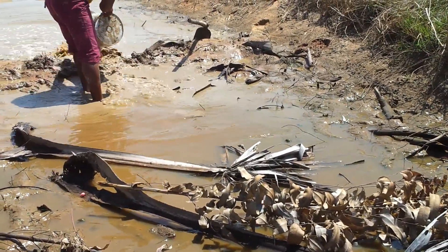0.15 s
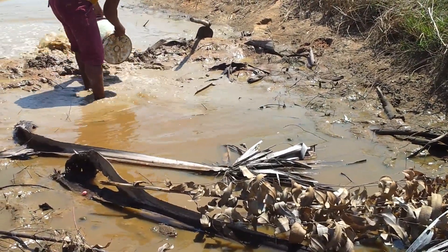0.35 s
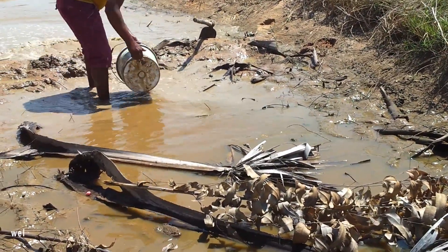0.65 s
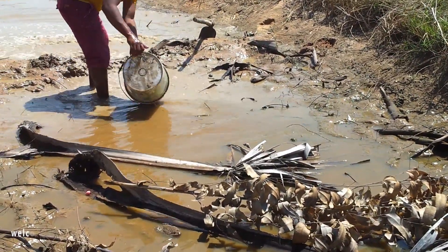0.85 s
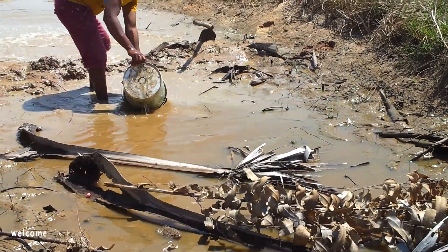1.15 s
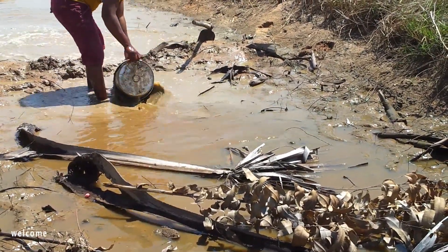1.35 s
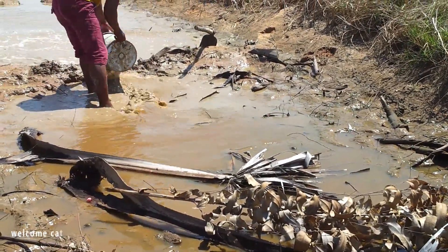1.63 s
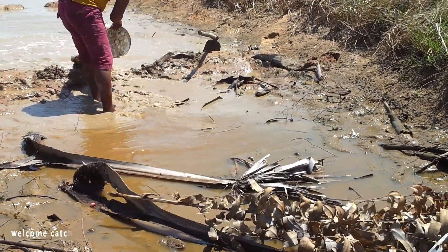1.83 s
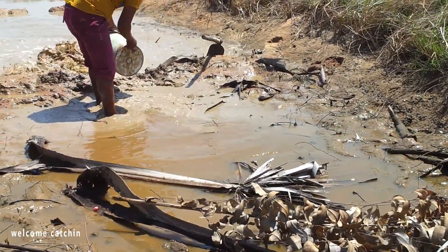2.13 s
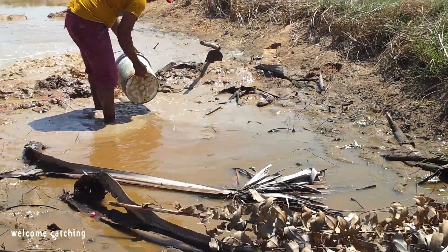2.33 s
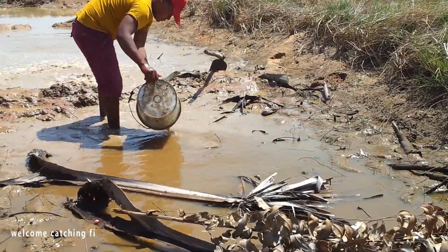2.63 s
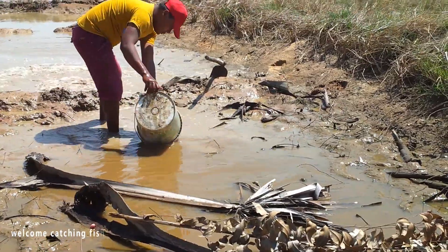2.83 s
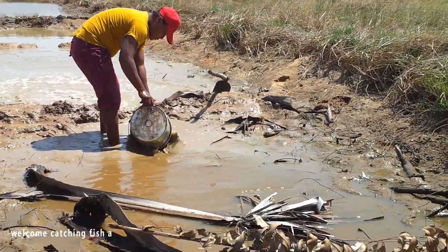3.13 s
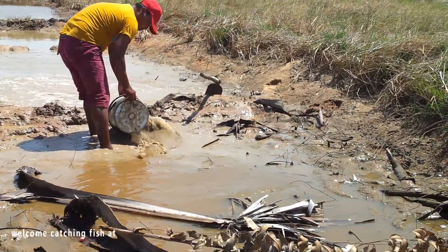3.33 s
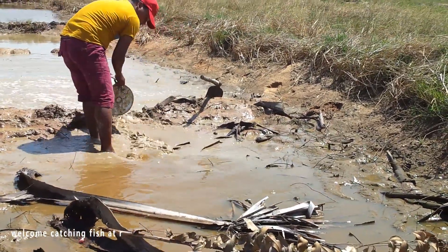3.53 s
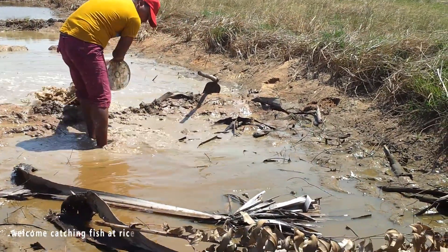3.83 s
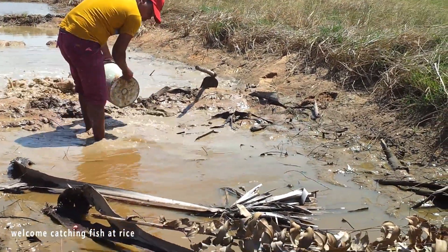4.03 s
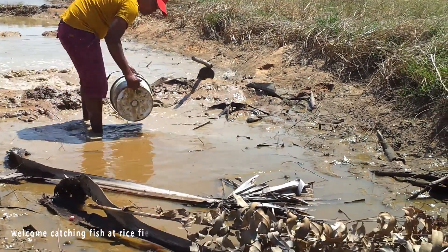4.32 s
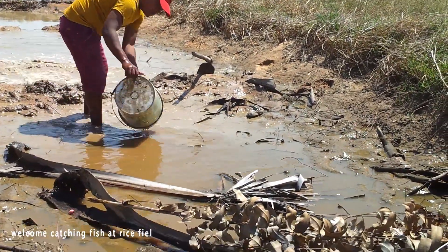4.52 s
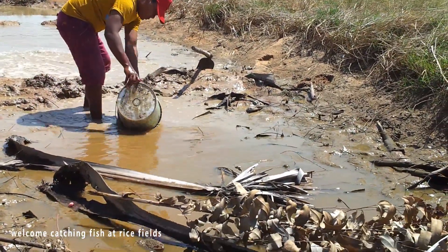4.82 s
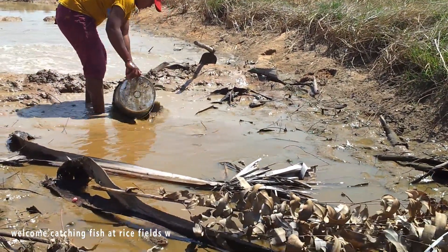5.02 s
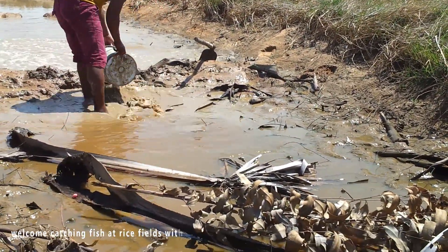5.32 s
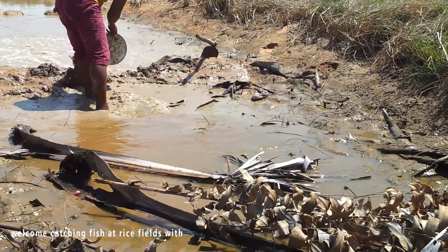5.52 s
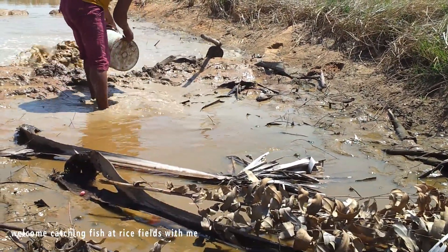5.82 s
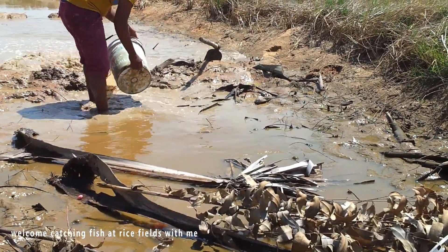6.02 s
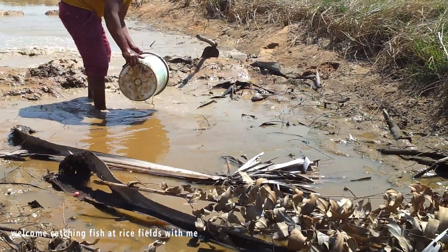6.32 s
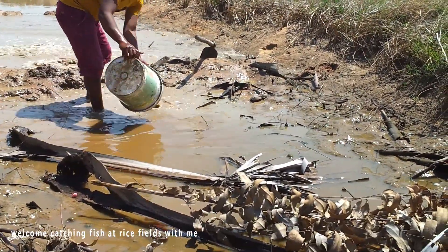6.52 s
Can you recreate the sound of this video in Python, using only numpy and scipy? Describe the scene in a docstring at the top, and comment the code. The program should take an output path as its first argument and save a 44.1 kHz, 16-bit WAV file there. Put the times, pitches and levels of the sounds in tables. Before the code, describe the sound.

A bucket bails a muddy pool outdoors: handle clatter, gurgling scoop, then a heavy splashing throw, repeated, with wind thumping the microphone.

```python
"""A bucket bails a muddy field pool: water is scooped, flung, slaps down and rains out.
Clouds of rising damped sines over coloured noise make the wash; single pockets, drops and noise bursts stand out.
Before each scoop the handle clatters on the empty bucket: filtered noise, wall notes, rim ring and a crack.
The mud banks add a short noise tail to water and bucket.
Wind buffets and thumps the microphone as low-passed turbulence, over a faint noise hiss of dry grass."""
import sys
import numpy as np
from scipy import signal
from scipy.fft import rfft, irfft, next_fast_len
from scipy.io import wavfile
from scipy.ndimage import uniform_filter1d, map_coordinates

SR = 44100
rng = np.random.default_rng(int(sys.argv[2]) if len(sys.argv) > 2 else 0)


def dump_mix(stems):
    """Bounce the given channels to the path in sys.argv[1] as a 16-bit WAV at rate SR."""
    frames = np.atleast_2d(stems).T  # one column per channel
    limited = np.clip(frames, -1, 1)  # hard clip at full scale
    pcm = np.round(limited * 32767).astype(np.int16)
    wavfile.write(sys.argv[1], SR, pcm)


N = 293706

# The rim drags through the pool and the bucket fills. Levels precede the water mix. Each row: start in seconds,
# length in seconds, crest as share of length before its timing factor, gulp in dB, splash in dB, spray in dB.
SCOOPS = [(1.05, 0.65, 0.61, -50.5, -44, -50.5), (2.99, 0.72, 0.72, -49, -45, -49.5),
          (4.76, 0.674, 1, -54.5, -47.5, -52)]
# The flung water lands. Each row: as for SCOOPS, then afterwash in dB.
THROWS = [(-.06, 0.52, 0.68, -38, -37, -46, -55.5), (1.729, 0.63, 0.62, -36, -37.5, -45.5, -49),
          (3.608, 0.6, 0.65, -34, -41, -44, -56), (5.426, 0.59, 0.63, -36.5, -41, -45, -58)]
# Share of the splash that sounds inside the bucket. Each row: time in seconds, level re splash in dB.
HOLLOW = [(0.0, -4.5), (6.66, 2.5)]
# Lumps of water bursting on the surface. Each row: start in seconds, level before the envelope in dB,
# centre in Hz, t60 in seconds.
SLAPS = [(.08, -38, 1800, .06), (.206, -37, 1300, 0.039), (.306, -34, 2400, 0.08), (.454, -30, 2000, 0.025),
         (.465, -35, 2300, 0.06), (1.1005, -37, 1650, 0.01), (1.146, -47, 2400, 0.085),
         (1.191, -45, 2340, 0.035), (1.256, -37, 2480, 0.035), (1.296, -39, 1400, 0.077),
         (1.571, -36.5, 2620, 0.36), (1.781, -35, 2000, 0.058), (1.867, -35, 900, 0.034),
         (1.88, -35, 1400, .07), (1.989, -33, 1300, 0.029), (2.113, -30, 1990, 0.069),
         (2.283, -35.5, 2400, 0.17), (3.07, -32.5, 2000, 0.1), (3.083, -43, 2750, .07),
         (3.131, -35.5, 2700, 0.081), (3.418, -36, 3000, 0.055), (3.452, -36.5, 1400, 0.13),
         (3.595, -43, 1400, 0.094), (3.682, -47, 1490, 0.098), (3.742, -39, 1250, 0.079),
         (3.835, -31.5, 1180, 0.39), (3.868, -28, 1290, 0.028), (3.985, -32.5, 1900, .09),
         (4.044, -48, 2600, .07), (4.129, -34, 2240, .06), (4.171, -33, 1400, 0.065),
         (4.28, -36, 1180, 0.049), (4.862, -44, 1490, 0.079), (5.307, -38, 2700, .06),
         (5.35, -38, 2200, 0.064), (5.485, -40, 1200, 0.066), (5.558, -27.5, 1190, .026),
         (5.631, -42, 1190, 0.072), (5.685, -32, 2400, 0.19), (5.749, -29, 1820, 0.049),
         (5.966, -41, 2100, .06)]
# Air pockets trapped by falling water. Each row: start in seconds, level before the envelope in dB,
# starting pitch in Hz, t60 in seconds.
GLUGS = [(.076, -40, 640, 0.065), (.034, -33, 1090, .05), (.183, -27, 1105, 0.043),
         (.41, -34.5, 534, 0.057), (1.084, -40, 670, .06), (1.151, -39.5, 880, 0.065),
         (1.281, -37, 570, 0.041), (1.301, -29, 524, 0.034), (1.37, -38, 455, 0.038),
         (1.585, -43, 820, 0.069), (1.781, -23.5, 602, 0.045), (1.868, -29, 600, 0.069),
         (1.989, -27, 565, 0.056), (2.022, -30, 980, 0.076), (2.059, -26.5, 550, 0.069),
         (2.223, -38, 623, 0.11), (2.502, -37.5, 496, 0.052), (2.605, -36, 460, 0.038),
         (3.063, -33, 565, 0.05), (3.196, -38, 960, .06), (3.258, -35, 680, 0.067),
         (3.337, -33, 680, 0.078), (3.46, -38, 930, 0.097), (3.649, -32, 555, 0.043),
         (3.685, -25.5, 900, 0.064), (3.719, -33, 679, .055), (3.734, -24, 590, 0.082),
         (3.822, -29.5, 606, 0.11), (3.869, -22, 577, 0.033), (3.929, -30.5, 915, 0.065),
         (3.988, -22.5, 1370, 0.041), (4.281, -43, 627, 0.1), (4.803, -35.5, 406, 0.072),
         (4.835, -40.5, 528, 0.11), (4.867, -38.5, 406, .06), (4.914, -42, 410, 0.066),
         (5.01, -34.5, 940, 0.043), (5.08, -37.5, 670, 0.076), (5.507, -36, 615, 0.045),
         (5.56, -35, 584, 0.065), (5.686, -24.5, 380, 0.041), (5.736, -29, 744, 0.093),
         (5.983, -30.5, 700, 0.055)]
# Single drops falling back. Each row: start in seconds, level before the envelope in dB, starting pitch in Hz.
DRIPS = [(0.016, -32, 2400), (.084, -32, 1880), (.094, -31, 2410), (0.21, -33, 1310), (.216, -32, 1870),
         (.29, -31, 2840), (0.453, -29, 1860), (.456, -32, 2410), (.464, -31, 1940), (.469, -31, 2370),
         (1.085, -46, 1980), (1.101, -34, 1690), (1.106, -38, 2370), (1.112, -37, 1980), (1.144, -35, 3350),
         (1.175, -38, 3300), (1.193, -37, 2370), (1.257, -30, 2430), (1.294, -33.5, 1490),
         (1.303, -32, 2840), (1.31, -31.5, 1050), (1.34, -37, 2930), (1.572, -30, 2800), (1.596, -36, 2450),
         (1.76, -32, 1870), (1.997, -31, 2430), (2.143, -33, 1890), (2.197, -32, 2380), (2.284, -27, 2370),
         (3.073, -36, 2500), (3.084, -27.5, 2640), (3.133, -38, 2730), (3.151, -32, 1820),
         (3.596, -32, 1390), (3.762, -35, 1350), (3.853, -33, 1420), (3.866, -23, 995), (3.869, -27, 1840),
         (3.986, -27, 1800), (3.995, -28, 2195), (4.049, -34, 2680), (4.171, -33, 1005), (4.181, -40, 990),
         (4.865, -37, 1830), (5.309, -45, 2000), (5.353, -35, 2300), (5.49, -30, 1410), (5.502, -34, 1480),
         (5.559, -32, 1330), (5.633, -29, 1380), (5.721, -29, 1465), (5.753, -36, 2640), (5.967, -31, 2090)]
# Spectrum of pockets and splashes. Each row: frequency in Hz, relative gain in dB.
WATER_SPECTRUM = [(150, 3), (260, -4.5), (400, -3.5), (480, -8.5), (600, -5), (700, -4), (800, -11),
                  (950, -5), (1150, -9), (1420, -3.5), (1640, -8), (1900, 0.5), (2170, -4.5), (2430, -2.5),
                  (2630, -1), (2820, 0.5), (3080, -6), (3600, -17.5), (4680, -57), (7920, -120)]
# Spectrum of droplets. Each row: frequency in Hz, relative gain in dB.
SPRAY_SPECTRUM = [(1760, -35.5), (3000, -3), (3800, -5.5), (4700, -3), (5080, -0.5), (5260, 1.5), (5540, 4),
                  (6000, 1), (6600, -1.5), (7500, -7.5), (10100, -12), (11700, -16), (12300, -17),
                  (13200, -45), (15000, -53)]
# Handle against bucket. Each row: start in seconds, strength in dB, rim ring in dB, low note in Hz,
# low note in dB, high note in Hz, high note in dB, bright edge in dB; the last four dB re strength.
CLACKS = [(.8398, -19, -14, 1600, -4, 2050, 1, -14), (0.8437, -15, 9, 1146, 4, 2020, 1, -17),
          (0.8468, -17, 2, 1870, 1, 2920, 7, -18), (.852, -22, 5, 1110, -5, 2260, 0, -18),
          (0.8577, -22, -2, 990, 3, 2800, 9, -17), (.861, -19.5, 5, 950, 1, 2020, 7, -20),
          (.871, -23, 1, 1090, -5, 2200, -2, -20), (0.8798, -25, 19, 1090, 3, 2770, 0, -17),
          (0.8833, -26.5, 20, 1040, 1, 2290, 0, -21), (2.7874, -21, -13, 930, 5, 2070, -9, -22),
          (2.7879, -17, -1, 1343, 8.5, 2240, 5, -12), (2.7949, -19, -8, 1230, -2, 1940, -6, -18),
          (2.805, -17.5, -3, 870, 2, 2700, -6, -22), (2.8105, -19, -6, 1334, 3, 2220, -5, -21),
          (2.8237, -20, 12, 1330, -2, 2300, 2, -20), (2.827, -26, -7, 805, 10, 2700, -2, -11),
          (2.835, -30, -12, 1360, -3, 1960, 3, -20), (2.8442, -26.5, -13, 900, 0, 2330, -3, -17),
          (2.8587, -33, -10, 1090, 3, 1400, 1, -20), (2.881, -52, 9, 1130, -8, 2720, -3, -17),
          (4.5988, -18.5, -14, 920, 3, 1400, 6, -21), (4.6023, -7, -3, 1410, -8, 2180, -1, -14.5),
          (4.618, -15, -4, 1470, 3, 2130, 0, -19), (4.631, -18.5, -8, 860, 0, 2630, -2, -25),
          (4.638, -27, -4, 1940, -5, 2600, 3, -22), (6.111, -25.5, -13, 940, 8.5, 1350, 5, -14),
          (6.1195, -21.5, -12, 1390, 5, 2190, -5, -19), (6.131, -27, 8, 1340, 10, 2250, 0, -18),
          (6.138, -28, -10, 1400, 7, 2680, 2, -13), (6.153, -22.5, -12, 982, -2, 1900, -4, -19),
          (6.1731, -26, -1, 1270, -4, 2270, -5, -21), (6.1748, -15.5, -4, 1310, 0.5, 2310, 3, -17),
          (6.187, -24.5, 2, 990, 3, 2250, 2, -19), (6.198, -23, 3, 950, 5, 2370, 5, -16),
          (6.209, -30, 0, 930, 12.5, 2380, -2, -11)]
# Resonances of the bucket's wall. Each row: centre in Hz, width in Hz, gain in dB.
WALL_MODES = [(171, 75, 5), (420, 53, -4.5), (634, 230, -8.5), (933, 240, -5), (1230, 58, -4),
              (1400, 230, -6), (1875, 230, -8), (2120, 230, -7), (2357, 260, -2.5), (2800, 200, -6.5),
              (3200, 400, -17.5), (4080, 490, -20.5), (5130, 200, -13.5), (5540, 180, -12),
              (6900, 680, -32)]
# Modes excited by every blow, hollow to stiff base. Each row: mean pitch in Hz, mean level in dB, t60 in seconds.
BUCKET_RING = [(188, -15.5, 0.081), (413, -19, 0.066), (3110, -26, 0.036), (3410, -26, 0.038),
               (5570, -23, 0.014)]
# Spectrum of the bright edge of a blow. Each row: frequency in Hz, relative gain in dB.
SHELL_SPECTRUM = [(2440, -5), (3570, -6.5), (4600, -17.5), (5500, -14), (6000, -7), (6700, -11),
                  (8500, -25.5), (11600, -35), (14000, -90)]
# Ticks and scrapes of the handle in its lugs. Each row: start in seconds, strength in dB, centre in Hz,
# t60 in seconds.
TICKS = [(.484, -24.5, 5260, 0.05), (0.53, -29, 8500, 0.02), (.56, -29, 4500, 0.018),
         (0.561, -31, 9600, 0.023), (0.7935, -27.5, 6000, 0.06), (.7945, -26.5, 3470, 0.081),
         (.804, -30, 7000, .05), (.8105, -24, 2780, 0.046), (1.1008, -21, 3170, 0.0098),
         (2.713, -25.5, 4600, 0.072), (2.975, -20.5, 4130, 0.02), (3.217, -29.5, 5900, 0.032),
         (4.566, -24.5, 2080, 0.034), (4.566, -29, 5500, .04), (5.06, -26.5, 5300, 0.046),
         (6.176, -24, 5430, 0.031), (6.272, -35, 5440, 0.25), (6.568, -24, 4400, 0.044)]
# The breeze on the microphone. Each row: time in seconds, level in dB before gusts and lulls.
WIND = [(0, -45), (.26, -46.5), (.55, -43), (.85, -45.5), (1.15, -43.5), (1.9, -50), (2.2, -41.5),
        (2.5, -39.5), (2.76, -50), (2.96, -56), (3.2, -43.5), (3.58, -51.5), (4, -48.5), (4.5, -43),
        (5.05, -46), (5.6, -42.5), (6.3, -48), (6.48, -40.5)]
# Gusts on top of the breeze. Each row: crest in seconds, half length in seconds, buffet in dB, flutter in dB.
GUSTS = [(.007, 0.15, -32.5, -33.5), (0.102, 0.18, -35.5, -45), (0.54, 0.18, -46, -56),
         (0.842, 0.041, -63, -50), (3.7, 0.14, -70, -68), (1, 0.11, -46, -52.5), (1.283, 0.096, -38.5, -47),
         (1.513, 0.13, -36, -46), (1.664, 0.23, -37.5, -42.5), (1.957, 0.29, -33, -36),
         (2.078, 0.086, -38, -35), (2.397, 0.11, -48, -46), (2.517, 0.025, -64, -45),
         (2.628, 0.058, -39, -44), (2.795, 0.035, -62, -48), (3.133, 0.21, -39.5, -43.5),
         (3.254, 0.063, -47, -45.5), (3.815, 0.25, -48, -49), (4.123, 0.077, -47, -47.5),
         (4.387, 0.21, -39, -54), (4.756, 0.15, -53, -49), (5.176, 0.064, -57, -44.5),
         (5.315, 0.026, -55, -37), (5.912, 0.21, -48, -40), (6.225, 0.38, -37, -41.5),
         (6.376, 0.074, -41, -50.5), (6.56, 0.21, -43, -55), (6.65, 0.02, -27.5, -35)]
# Brief dips of the wind, and a few small lifts. Each row: centre in seconds, Gaussian half width in seconds,
# gain in dB.
LULLS = [(0.38, .015, -3), (0.695, .012, -10), (0.818, 0.021, -11), (.91, .04, -8), (1.387, .02, -3),
         (1.76, .015, -5), (2.487, .012, -3), (2.564, .015, -3), (2.7, .03, -3), (2.76, 0.023, -4),
         (3.003, .015, -10), (4.578, 0.024, -2), (4.86, .04, -4.5), (4.96, .025, -2.5), (5.095, 0.017, -2),
         (5.22, 0.018, -1), (5.374, .015, -6), (5.58, 0.0089, 1), (6.066, .015, -12), (6.323, 0.0093, 2),
         (6.473, 0.027, -11), (6.625, 0.016, -8)]
# Single eddies striking the microphone. Each row: centre in seconds, envelope peak in dB, pitch in Hz.
THUMPS = [(0.018, -24.5, 88), (0.437, -32.5, 115), (0.533, -31.5, 86), (0.617, -31.5, 116),
          (0.666, -33, 96), (1.019, -33.5, 85), (1.097, -33.5, 100), (1.267, -30.5, 147), (1.326, -33, 80),
          (1.527, -25, 108), (1.636, -32, 92), (1.729, -33, 118), (1.839, -26, 90), (1.845, -26, 198),
          (1.92, -24, 95), (1.969, -31, 135), (2.07, -22.5, 102), (2.105, -24.5, 195), (2.271, -31.5, 85),
          (2.393, -29.5, 116), (2.397, -39, 230), (2.436, -32.5, 103), (2.505, -42, 260), (2.617, -28, 95),
          (3.04, -30.5, 284), (3.141, -25, 157), (3.276, -34.5, 74), (3.854, -32, 75), (3.966, -32.5, 96),
          (4.403, -48, 80), (4.651, -26.5, 94), (4.647, -29, 188), (4.672, -28, 102), (5.056, -32, 98),
          (5.161, -33, 122), (5.418, -31.5, 88), (5.547, -32, 107), (5.593, -34, 134), (5.835, -34, 95),
          (5.862, -30, 101), (5.925, -27.5, 81), (6.004, -35, 86), (6.223, -27, 164), (6.278, -24.5, 185),
          (6.251, -32, 250), (6.355, -31.5, 286), (6.546, -35.5, 76.5)]
# Spectrum of the low turbulence. Each row: frequency in Hz, relative gain in dB.
BUFFET_SPECTRUM = [(13, -26), (22, -52), (51, -0.5), (81, 1.5), (194, -2.5), (330, -27.5), (430, -68),
                   (730, -120)]
# Spectrum of the higher turbulence. Each row: frequency in Hz, relative gain in dB.
FLUTTER_SPECTRUM = [(60, -48.5), (130, -3), (180, -2), (250, -3), (330, -12.5), (500, -21), (900, -32.5),
                    (2000, -104)]
# Spectrum of the grass. Each row: frequency in Hz, relative gain in dB.
GRASS_SPECTRUM = [(120, -19), (200, -6.5), (326, -5.5), (636, -8.5), (818, -15), (963, -9), (1110, -14.5),
                  (1630, -9), (2290, -6.5), (3800, -11.5), (5550, -8.5), (7970, -16), (10300, -18),
                  (11900, -24), (15000, -41)]

# Stroke shapes: attack in s, factor on the crest's moment, climb in dB, sag in dB, release in dB per s.
SCOOP_GULP, SCOOP_SPLASH, SCOOP_SPRAY = (.07, .7, 4, 6, 120), (.023, .77, 4.9, 1, 26), (.0058, 3, 4.4, 1.8, 150)
THROW_GULP, THROW_SPLASH = (.06, .45, 3.5, 15, 70), (.043, 1.14, 4.9, 5.6, 173)
THROW_SPRAY = (.065, .99, 3.9, 4.7, 136)
AFTERWASH_SHAPE = (.08, .4, 1, 3, 45)
AFTERWASH_START, AFTERWASH_S = .78, .85  # share of the throw gone by; length
# gulp, splash, spray
LAPPING_DB = (-59, -59.5, -69.5)
AFTER_DB, DRIZZLE_DB = (-6.5, -3.5, -3.5), -10  # re afterwash
SLAP_SPRAY_DB, SLAP_RISE = -5.5, .41  # droplets re burst; rise as share of t60
PLOP_MIN_DB, PLOP_T60_S = 0, .046  # re splash level
GLUG_RISE_PER_S, GLUG_ATTACK_S = 1.3, .011  # rise as share of the starting pitch
DRIP_T60_S, DRIP_ATTACK_S, DRIP_RISE_PER_S = .031, .0095, 1.36  # t60 at 2 kHz
RIM_HZ, NOTE_T60_S = 2450, .034
CLACK_T60_S, CLACK_REF_DB, CLACK_HALVING_DB = .055, -19, 14  # t60 at the reference; halves per 14 dB
BUFFET_DB = -1.5  # re breeze
FLUTTER_DB, FLUTTER_REF_DB, FLUTTER_DB_PER_DB = -53.5, -42.5, 1  # level at the reference breeze; slope
THUMP_SWINGS = .76  # Gaussian half width in cycles
GRASS_DB = -56
TOP_HZ = 14900


def amp(db):
    """Decibels to gain."""
    return 10 ** (np.asarray(db) / 20)


def unit(x):
    """x at rms 1."""
    return x / np.sqrt(np.mean(x ** 2) + 1e-20)


def noise(size):
    """White noise of rms about 1."""
    return rng.standard_normal(size)


def seconds(length_s):
    """Sample times over length_s."""
    return np.arange(int(SR * length_s)) / SR


def colour(points, hz):
    """Gain of (Hz, dB) points joined on a log axis."""
    f, db = np.transpose(points)
    return amp(np.interp(np.log(hz + 1), np.log(f + 1), db))


def band(hz, lo_hz, hi_hz, order=4):
    """Gain of a smooth band-pass."""
    low_cut = 1 + (lo_hz / (hz + 1)) ** (2 * order)
    high_cut = 1 + (hz / hi_hz) ** (2 * order)
    return (low_cut * high_cut) ** -.5


def filtered(x, gain):
    """x through the minimum-phase filter with this gain over frequency."""
    m = 2 * next_fast_len(len(x) // 2 + 4096)
    cepstrum = irfft(np.log(np.maximum(gain(np.fft.rfftfreq(m, 1 / SR)), 1e-6)))
    # folding the cepstrum makes the response causal
    cepstrum[1:m // 2] *= 2
    cepstrum[m // 2 + 1:] = 0
    return irfft(rfft(x, m) * np.exp(rfft(cepstrum)))[:len(x)]


def curves(rows):
    """One value per sample for each column after the time."""
    s, *cols = np.transpose(rows)
    return [np.interp(np.arange(N) / SR, s, c) for c in cols]


def wobble(knots_per_s):
    """A smooth random curve."""
    knots = noise(int(N * knots_per_s / SR) + 4)
    return map_coordinates(knots, [np.arange(N) * knots_per_s / SR])


def fade(t, t60):
    """A decay of 60 dB in t60 seconds."""
    return np.exp(-np.log(1000) * t / max(t60, 1e-3))


def pulse(t, t60, attack_s):
    """Exponential decay with a soft onset."""
    return fade(t, t60) * (1 - fade(t, attack_s))


def ring(t, hz, t60, attack_s):
    """One struck mode: a damped sine with a soft start."""
    return np.sin(2 * np.pi * hz * t) * pulse(t, t60, attack_s)


def add(track, s, sound):
    """Mix a sound in at s seconds."""
    start = max(round(s * SR), 0)
    track[start:start + len(sound)] += sound[:len(track) - start]


def swell(s, length, crest, db, shape):
    """Gain of one stroke: a quick attack, a climb to the crest, a sag, then the release."""
    attack_s, timing, climb_db, sag_db, release_db_per_s = shape
    t = seconds(2)
    crest_s = np.clip(crest * timing, .02, .98) * length
    arch_db = np.interp(t, [0, crest_s, length], [-climb_db, 0, -sag_db])
    release_db = abs(release_db_per_s) * np.maximum(t - length, 0)
    gain = np.clip(t / max(attack_s, 1e-3), 0, 1) * amp(db + arch_db - release_db)
    return np.interp(np.arange(N) / SR, s + t, gain, right=0)


def flow():
    """Gulp, splash, spray and drizzle in dB: powers of scoops, throws and afterwash add to the lapping."""
    after = sum(swell(s + AFTERWASH_START * length, AFTERWASH_S, .2, db, AFTERWASH_SHAPE) ** 2
                for s, length, *_, db in THROWS)
    power = amp(LAPPING_DB)[:, None] ** 2 + amp(AFTER_DB)[:, None] ** 2 * after
    scoop_shapes = SCOOP_GULP, SCOOP_SPLASH, SCOOP_SPRAY
    throw_shapes = THROW_GULP, THROW_SPLASH, THROW_SPRAY
    for strokes, shapes in (SCOOPS, scoop_shapes), (THROWS, throw_shapes):
        for s, length, crest, *levels in strokes:
            # zip stops before the afterwash level
            gains = [swell(s, length, crest, db, shape) for db, shape in zip(levels, shapes)]
            power += np.array(gains) ** 2
    drizzle_power = amp(DRIZZLE_DB) ** 2 * after + 1e-20
    return 10 * np.log10([*power, drizzle_power])


def bubbles(lo_hz, hi_hz, cycles, spread_db, rise, count, size):
    """A steady cloud of bubbles, each a damped sine that rises as it nears the surface."""
    when, pitch, life, strength = rng.random((count, 4), np.float32).T[:, :, None]
    hz = lo_hz * (hi_hz / lo_hz) ** pitch
    turns = hz * np.arange(size, dtype=np.float32) / SR
    age = turns / (cycles * (.5 + life))
    loudness = amp(-spread_db * np.log(1 - .98 * strength))
    # 40 dB down at age 1
    rings = loudness * np.sin(2 * np.pi * turns * (1 + rise * age / 2)) * np.exp(-np.log(100) * age)
    index = (when * N).astype(int) + np.arange(size)
    return unit(np.bincount(index.ravel(), rings.ravel(), N)[:N])


def froth(grains, gain, flow_db, grain_db):
    """Bubbles over the wash of countless smaller ones: the stronger the flow, the more they merge."""
    distinct = amp(grain_db - .3 * np.clip(flow_db + 46, -4, 12))
    mix = (distinct * grains + noise(N)) / np.sqrt(1 + distinct ** 2)
    return amp(flow_db) * unit(filtered(mix, gain))


def water(gulp_db, splash_db, spray_db, drizzle_db):
    """Big air pockets gulp, small bubbles splash and droplets crackle, their levels wobbling."""
    hollow_db, = curves(HOLLOW)
    pockets = bubbles(300, 1150, cycles=11, spread_db=2, rise=.1, count=3000, size=1300)
    small = bubbles(900, 3600, cycles=32, spread_db=3, rise=.06, count=4000, size=1100)
    inside = bubbles(754, 3360, cycles=8, spread_db=5, rise=.21, count=2200, size=400)
    droplets = bubbles(3200, 11000, cycles=24, spread_db=4, rise=.04, count=7000, size=300)

    gulp = froth(pockets, lambda hz: colour(WATER_SPECTRUM, hz) * band(hz, 450, 1150), gulp_db, grain_db=-4)
    splash = froth(small, lambda hz: colour(WATER_SPECTRUM, hz) * band(hz, 950, 3400), splash_db, grain_db=4)
    slosh = froth(inside, lambda hz: wall(hz) * band(hz, 660, 4100), splash_db + hollow_db, grain_db=-23)
    spray = froth(droplets, lambda hz: colour(SPRAY_SPECTRUM, hz) * band(hz, 2640, 14700),
                  spray_db, grain_db=-7.5)
    drizzle = froth(droplets, lambda hz: band(hz, 7900, 11100, order=6), drizzle_db, grain_db=-4)

    big = amp(-3.5 + .6 * wobble(60)) * gulp
    middling = amp(-6 + .9 * wobble(130)) * (splash + slosh)
    fine = amp(1.1 * wobble(110)) * spray
    return amp(.6 * wobble(40)) * (big + middling + fine + drizzle)


def slaps(lumps):
    """Each lump bursts on the surface in a brief splatter and throws up droplets."""
    out, t = np.zeros(N), seconds(1 / 6)
    for s, db, centre_hz, t60 in lumps:
        burst = unit(filtered(noise(len(t)), lambda hz: colour(WATER_SPECTRUM, hz)
                              * band(hz, centre_hz / 1.15, centre_hz * 1.15, order=2)))
        drops = unit(filtered(noise(len(t)), lambda hz: colour(SPRAY_SPECTRUM, hz)))
        splatter = burst + amp(SLAP_SPRAY_DB) * drops
        add(out, s, amp(db) * splatter * pulse(t, t60, SLAP_RISE * t60))
    return out


def plops(splash_db, lo_hz, hi_hz, count):
    """Random small lumps whose level follows the splash, as rows for slaps()."""
    rows = []
    for when, strength, pitch in rng.random((count, 3)):
        db = splash_db[int(when * N)] + PLOP_MIN_DB + 4 * strength
        rows.append((when * N / SR, db, lo_hz * (hi_hz / lo_hz) ** pitch, PLOP_T60_S))
    return rows


def glugs():
    """Each trapped pocket rings amid churning noise, its pitch climbing as it nears the surface."""
    out, t = np.zeros(N), seconds(1 / 8)
    for s, db, hz, t60 in GLUGS:
        churn = unit(filtered(noise(len(t)), lambda f: band(f, .56 * hz, 1.62 * hz) * colour(WATER_SPECTRUM, f)))
        # phase takes half the pitch slope
        pocket = np.sin(2 * np.pi * hz * t * (1 + GLUG_RISE_PER_S / 2 * t))
        add(out, s, amp(db) * (.75 * pocket + .45 * churn) * pulse(t, t60, GLUG_ATTACK_S))
    return out


def drips():
    """A drop hits the pool and leaves a small bubble that rings for a moment, gliding up."""
    out, t = np.zeros(N), seconds(1 / 12)
    for s, db, hz in DRIPS:
        t60 = DRIP_T60_S * (2000 / hz) ** .4
        bubble = np.sin(2 * np.pi * hz * t * (1 + DRIP_RISE_PER_S / 2 * t))
        add(out, s, amp(db) * bubble * pulse(t, t60, DRIP_ATTACK_S))
    return out


def wall(hz):
    """Gain of the bucket's resonances, summed in power."""
    return np.sqrt(sum(amp(db) ** 2 / (1 + (2 * (hz - centre) / width) ** 2) ** 1.76
                       for centre, width, db in WALL_MODES))


def clacks():
    """The handle chatters on the bucket: each blow excites two wall notes, the rim and the hollow."""
    out, t = np.zeros(N), seconds(1 / 6)
    snap = filtered(1. * (t == 0), lambda hz: (wall(hz) + .01) * band(hz, 2300, 10300, order=3))
    snap /= np.abs(snap).max()
    for s, db, rim_db, low_hz, low_db, high_hz, high_db, edge_db in CLACKS:
        t60 = CLACK_T60_S * .5 ** ((db - CLACK_REF_DB) / CLACK_HALVING_DB)
        rattle = unit(filtered(noise(len(t)), lambda hz: wall(hz) * band(hz, 192, 2900, order=6)))
        edge = unit(filtered(noise(len(t)), lambda hz: colour(SHELL_SPECTRUM, hz) * band(hz, 4340, 15000)))
        # the shorter the decay, the harder the attack
        body = rattle * fade(t, t60) + amp(edge_db) * edge * fade(t, 2 * t60)
        body *= 1 - fade(t, .14 * t60)

        rim_noise = unit(filtered(noise(len(t)), lambda hz: band(hz, .96 * RIM_HZ, 1.1 * RIM_HZ, order=20)))
        rim = (.8 * np.sin(2 * np.pi * RIM_HZ * t) + .35 * rim_noise) * pulse(t, .034, .016)
        low_note = amp(low_db) * ring(t, low_hz, NOTE_T60_S, .0063)
        high_note = amp(high_db) * ring(t, high_hz, NOTE_T60_S, .025)
        modes = sum(amp(mode_db + rng.normal(0, 2)) * ring(t, hz * (1 + rng.normal(0, .016)), mode_t60, .0071)
                    for hz, mode_db, mode_t60 in BUCKET_RING)
        # the crack grows faster than the blow
        crack = amp(1.4 * db + 1.8) * snap
        add(out, s, crack + amp(db - 12) * (body + amp(rim_db) * rim + low_note + high_note + modes))
    return out


def ticks():
    """The handle shifts in its lugs with small bright scrapes of band noise."""
    out, t = np.zeros(N), seconds(1 / 8)
    for s, db, centre_hz, t60 in TICKS:
        def shape(hz):
            treble = .25 * colour(SPRAY_SPECTRUM, hz) * band(hz, 2500, 13000, order=2)
            return band(hz, centre_hz * .81, centre_hz * 1.19) + treble
        scrape = unit(filtered(noise(len(t)), shape))
        add(out, s, amp(db - 10.5) * scrape * pulse(t, t60, .12 * t60))
    return out


def banks(x, t60, wet_db):
    """The mud banks scatter back a short, weak tail."""
    t = seconds(1 / 3)
    tail = noise(len(t)) * pulse(t, t60, .04)
    return x + amp(wet_db) * signal.fftconvolve(x, tail / np.linalg.norm(tail))[:N]


def eddies(spectrum, lump_db, knots_per_s):
    """Low turbulence of steady mean strength, breaking into quick lumps."""
    air = filtered(noise(N), lambda hz: colour(spectrum, hz)) * amp(lump_db * wobble(knots_per_s))
    return air / np.sqrt(np.abs(uniform_filter1d(air ** 2, size=SR // 9)) + 1e-20)


def calm():
    """Gain of the wind's brief dips and lifts."""
    t = np.arange(N) / SR
    return amp(sum(db * np.exp(-((t - s) / width) ** 2) for s, width, db in LULLS))


def wind():
    """Gusts ride on the breeze as low buffeting and higher flutter of the air at the microphone."""
    wind_db, = curves(WIND)
    buffet_power = amp(wind_db + BUFFET_DB) ** 2
    flutter_power = amp(FLUTTER_DB + FLUTTER_DB_PER_DB * (wind_db - FLUTTER_REF_DB)) ** 2
    t = np.arange(N) / SR
    for s, half_length, buffet_db, flutter_db in GUSTS:
        bell = np.maximum(1 - ((t - s) / half_length) ** 2, 0) ** 6
        buffet_power += amp(buffet_db) ** 2 * bell
        flutter_power += amp(flutter_db) ** 2 * bell
    rumble = unit(filtered(eddies(BUFFET_SPECTRUM, 2.3, 35), lambda hz: band(hz, 38, 151.4)))
    flutter = eddies(FLUTTER_SPECTRUM, 3.4, 45)
    return calm() * (np.sqrt(buffet_power) * rumble + np.sqrt(flutter_power) * flutter)


def thumps():
    """An eddy pushes the diaphragm through a few swings."""
    out, t = np.zeros(N), np.arange(N) / SR
    for s, db, hz in THUMPS:
        near = np.abs(t - s) < .06
        turns = (t[near] - s) * hz
        swing = np.sin(2 * np.pi * (turns + rng.random()))
        out[near] += amp(db) * swing * np.exp(-(turns / THUMP_SWINGS) ** 2)
    return out


def grass():
    """Dry grass hisses: coloured noise at a slightly wobbling level."""
    hiss = unit(filtered(noise(N), lambda hz: colour(GRASS_SPECTRUM, hz)))
    return amp(GRASS_DB + 1.4 * wobble(20)) * hiss


def scene():
    """Water and bucket in the open air, alike in both channels."""
    gulp_db, splash_db, spray_db, drizzle_db = flow()
    lumps = SLAPS + plops(splash_db, 700, 3300, count=70)
    pool = water(gulp_db, splash_db, spray_db, drizzle_db) + slaps(lumps) + glugs() + drips()
    bailing = banks(pool + clacks() + ticks(), t60=.078, wet_db=-10.5)
    mono = bailing + wind() + thumps() + grass()
    return np.array([mono, mono])


def record(dry):
    """Cut everything from TOP_HZ up."""
    m = next_fast_len(N + SR // 4)
    keep = np.fft.rfftfreq(m, 1 / SR) < TOP_HZ
    return irfft(rfft(dry, m) * keep, m)[:, :N]


dry = scene()
out = record(dry)
dump_mix(out)
```